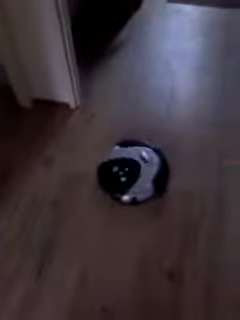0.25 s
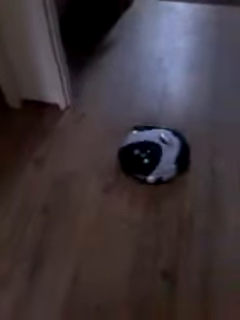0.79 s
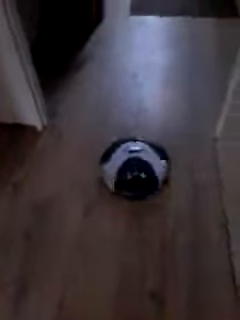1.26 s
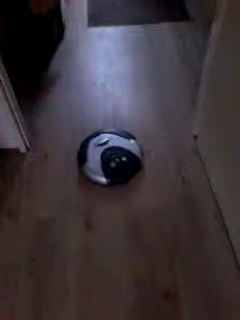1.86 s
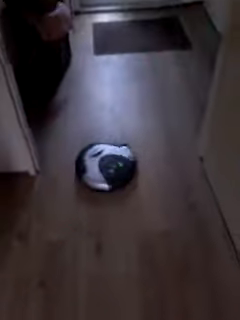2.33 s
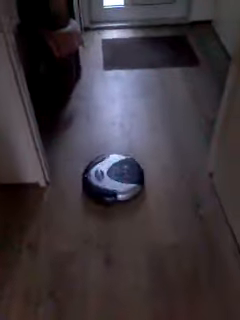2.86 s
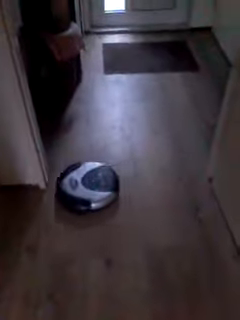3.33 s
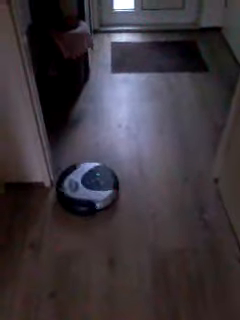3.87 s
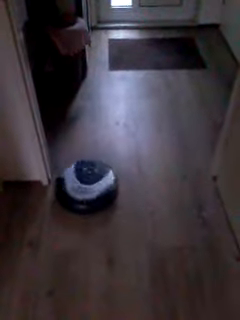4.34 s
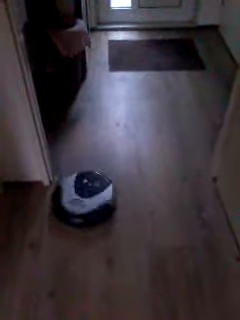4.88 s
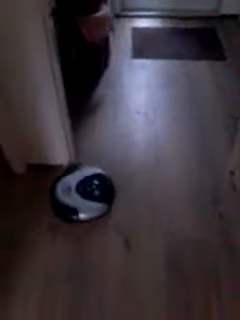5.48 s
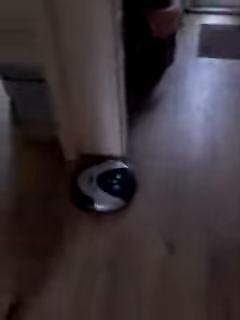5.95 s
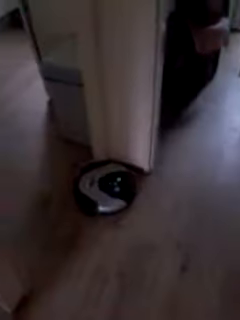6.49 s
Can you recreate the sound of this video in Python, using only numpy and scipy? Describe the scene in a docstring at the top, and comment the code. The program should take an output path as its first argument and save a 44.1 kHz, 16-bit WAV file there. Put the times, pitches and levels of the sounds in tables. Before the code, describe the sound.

Steady bright hiss and faint motor whine of a small robot cleaner indoors, with one quick rattling bump, then hissing strongest at the end.

```python
"""A robot vacuum cleaner rolls over a wooden hallway floor, heard by one microphone whose port peaks near 7 kHz.
From the start: shaped noise for rushing air, a narrow noise band drifting from 455 Hz for the humming shell,
and sine orders of a motor shaft and a fan that fade in and out. Brief swells of narrow noise join from 0.6 s.
At 3.67 s it bumps a door frame: four contacts in 0.13 s click, rattle the frame and boom in the floorboards.
The air, hum and orders run on to the end at 6.72 s, with more swells on the way and the hiss strongest at the end."""
import sys
import numpy as np
from scipy import signal
from scipy.fft import rfft, irfft, next_fast_len
from scipy.io import wavfile
from scipy.ndimage import uniform_filter1d, map_coordinates

SR = 44100
rng = np.random.default_rng(int(sys.argv[2]) if len(sys.argv) > 2 else 0)


def unload_audio(sound):
    """Save the sound as a 16-bit wav file, at the path given as the first command line argument."""
    columns = np.transpose(np.atleast_2d(sound))
    # keep every value between -1 and 1, then stretch to whole-number steps
    steps = np.round(np.clip(columns, -1, 1) * 32767)
    wavfile.write(sys.argv[1], SR, steps.astype(np.int16))


N = 296352
T = np.arange(N) / SR  # time_s

# hiss of the air before flutter: time_s, level_db
HISS_LEVEL = [(0.0, -27), (0.8, -27), (1.1, -27.5), (2.08, -27), (2.5, -28.5), (3.6, -28), (3.82, -29),
              (4.53, -28.5), (5.39, -26.5), (5.76, -27.5), (6.72, -24.5)]
# hiss colour, relative: freq_hz, density_db (per Hz)
HISS_SPECTRUM = [(2650, -25), (4500, -19), (6000, -9), (6800, 0), (7050, 1), (7910, -5), (9440, -18),
                 (12500, -25), (14300, -29), (15000, -33)]
# roar colour, relative: freq_hz, density_db (per Hz)
ROAR_SPECTRUM = [(25, -26), (60, -13.5), (110, -18), (160, -14.5), (260, -12), (350, -6), (650, -4.5),
                 (1300, -0.5), (1750, -3), (2500, 0), (3300, -4), (4600, -3.5), (6000, -4.5)]
# shell hum before waver: time_s, centre_hz, level_db
SHELL_HUM = [(0.0, 455, -47), (0.4, 460, -48.5), (0.8, 467, -44), (1.14, 465.5, -40), (1.76, 476, -45),
             (2.36, 453.8, -45), (3.0, 425.3, -49.5), (3.65, 418, -39.5), (4.1, 420, -52), (5.3, 424, -44),
             (5.65, 435.5, -51), (6.2, 450, -42), (6.45, 460, -50), (6.72, 473.4, -46)]
# narrow bands that swell and fade: peak_s, sigma_s, centre_hz, peak_level_db
SWELLS = [(0.61, 0.072, 1330, -43), (4.62, 0.37, 877, -45), (4.77, 0.23, 835, -44),
          (5.232, 0.069, 1595, -39), (5.348, .2, 1490, -43.5), (5.478, 0.06, 571, -44),
          (5.66, 0.2, 1296, -43), (6.274, 0.11, 1933, -41)]
# motor orders before fading: multiple_of_shaft, rms_db
SHAFT_ORDERS = [(3, -68.5), (4, -65), (15, -58.5), (24, -57.5), (25, -52), (33, -55.5), (36, -71),
                (42, -58)]
# fan orders before fading: multiple_of_fan, rms_db
FAN_ORDERS = [(3, -59.5), (5, -56.5), (7, -52.5), (8, -54), (10, -54.5), (11, -59.5)]
# contacts with the door frame, drive levels: start_s, click_db, knock_db
CONTACTS = [(3.669, -20, -30.5), (3.692, -29, -30.5), (3.745, -28, -32), (3.799, -36, -35)]
# click colour, relative: freq_hz, density_db (per Hz)
CLICK_SPECTRUM = [(1000, -27), (2500, -10), (5000, -4.5), (7200, 3), (9500, -8), (12000, -19.5),
                  (15000, -30)]
# door frame modes, relative: centre_hz, width_hz, gain_db
FRAME_MODES = [(130, 40, 1.5), (226, 71, 0.5), (412, 130, 0.5), (700, 290, -6.5), (1320, 190, -4),
               (2610, 490, -7.5)]
# floorboard modes: centre_hz, width_hz, gain_db
BOARD_MODES = [(125, 40, 3), (170, 40, 0), (228, 35, -3)]

SHAFT_HZ, FAN_HZ = 59.2, 165.8  # mean rotation rates
ROAR_MEAN_DB, ROAR_FOLLOWS = -32.5, 0.46  # second: share of the hiss level swings, in dB
HUM_WAVER_DB = 1.5
SWELL_WIDTH = 0.028  # share of centre_hz
RATTLE_T60_S = 0.2
BOOM_OVER_KNOCK_DB, FRAME_GAIN_DB = 29.5, 19
TOP_HZ = 15050


def amp(db):
    """Amplitude gain of a level in dB."""
    return 10 ** (np.asarray(db) / 20)


def unit(x):
    """x scaled to rms 1."""
    return x / np.sqrt(np.mean(np.abs(x) ** 2) + 1e-20)


def curves(rows):
    """Each column after time_s, interpolated to one value per sample."""
    time_s, *columns = np.transpose(rows)
    return [np.interp(T, time_s, column) for column in columns]


def wobble(knots_per_s):
    """Smooth random curve through Gaussian knots."""
    knots = rng.standard_normal(int(N * knots_per_s / SR) + 4)
    return map_coordinates(knots, [T * knots_per_s])


def filtered(x, response):
    """x through a frequency response, by zero-padded FFT."""
    size = next_fast_len(N + 8192)
    freq_hz = np.fft.rfftfreq(size, 1 / SR)
    return irfft(rfft(x, size) * response(freq_hz), size)[..., :N]


def patches(shape, bins, frames):
    """Random field of rms 1, smoothed over bins and frames."""
    field = uniform_filter1d(rng.standard_normal(shape), size=bins, axis=0)
    return unit(uniform_filter1d(field, size=frames, axis=1))


def rush(spectrum, broad_db, fine_db):
    """Coloured noise of rms 1; broad and fine random patches stand for wall reflections adding or cancelling."""
    stft = signal.stft(rng.standard_normal(N), nperseg=2048, noverlap=1536)[2]
    broad = broad_db * patches(stft.shape, 16, 16)
    fine = fine_db * patches(stft.shape, 3, 24)
    noise = signal.istft(stft * amp(broad + fine), nperseg=2048, noverlap=1536)[1][:N]
    freq_hz, density_db = np.transpose(spectrum)

    def colour(hz):
        gain_db = np.interp(np.log(hz + 1), np.log(freq_hz), density_db, right=-120)
        return (hz > freq_hz[0] / 2) * amp(gain_db)

    return unit(filtered(noise, colour))


def band(centre_hz, width_hz):
    """Narrow noise of rms 1: two slow noises modulate carriers in quadrature at a fixed or moving centre."""
    slow = filtered(rng.standard_normal((2, N)), lambda f: 1 / (1 + (2 * f / width_hz) ** 2))
    phase = 2 * np.pi * np.cumsum(centre_hz + 0 * T) / SR
    return unit(slow[0] * np.cos(phase) + slow[1] * np.sin(phase))


def resonances(modes):
    """Causal response of parallel second-order modes with alternating signs."""
    def response(f):
        total = 0
        for k, (centre_hz, width_hz, gain_db) in enumerate(modes):
            damping = 1j * f * width_hz
            total = total + (-1) ** k * amp(gain_db) * damping / (centre_hz**2 - f * f + damping)
        return total

    return response


def air():
    """Turbulent hiss and broad roar share a flutter; the hiss throbs faintly at the fan rate."""
    hiss_db, = curves(HISS_LEVEL)
    roar_db = ROAR_MEAN_DB + ROAR_FOLLOWS * (hiss_db - hiss_db.mean())
    flutter = wobble(12)
    throb = 1 + 0.039 * np.sin(2 * np.pi * FAN_HZ * T + 2 * wobble(2.4))
    hiss_gain = amp(hiss_db + 0.3 * flutter + 0.45 * wobble(40)) * throb
    hiss = hiss_gain * rush(HISS_SPECTRUM, broad_db=1.04, fine_db=1.5)
    roar = amp(roar_db + 0.27 * flutter) * rush(ROAR_SPECTRUM, broad_db=0.82, fine_db=2.1)
    return hiss + roar


def shell():
    """The hollow shell hums in a wavering band that drifts as the machine turns; other bands swell briefly."""
    centre_hz, level_db = curves(SHELL_HUM)
    out = amp(level_db + HUM_WAVER_DB * wobble(6)) * band(centre_hz, width_hz=52)
    for peak_s, sigma_s, swell_hz, peak_db in SWELLS:
        envelope = np.exp(-0.5 * ((T - peak_s) / sigma_s) ** 2)
        out += amp(peak_db) * envelope * band(swell_hz, SWELL_WIDTH * swell_hz)
    return out


def motor(rate_hz, orders, drift, fade_db):
    """Multiples of an unsteady rotation; each fades and slips in phase as the machine moves between the walls."""
    turn = 2 * np.pi * np.cumsum(rate_hz * (1 + drift * wobble(4))) / SR
    out = np.zeros(N)
    for multiple, rms_db in orders:
        gain = np.sqrt(2) * amp(rms_db + fade_db * wobble(5))
        out += gain * np.sin(round(multiple) * turn + 2 * wobble(8))
    return out


def bump():
    """Bumper meets door frame and rebounds: contacts click, shake the frame modes and strike the board modes."""
    shake, click, blows = np.zeros((3, N))
    for start_s, click_db, knock_db in CONTACTS:
        t = np.maximum(T - start_s, 0)
        shake += amp(knock_db - 60 * t / RATTLE_T60_S) * (1 - np.exp(-t / 0.0038))
        tick = amp(-60 * t / 0.014)
        hallway_tail = 0.71 * amp(-60 * t / 0.21)
        click += amp(click_db) * (1 - np.exp(-t / 0.00033)) * (tick + hallway_tail)
        blows[round(start_s * SR)] = amp(knock_db + BOOM_OVER_KNOCK_DB)

    def low_cut(f):
        return (1j * f / (90 + 1j * f)) ** 4

    frame, boards = resonances(FRAME_MODES), resonances(BOARD_MODES)
    rattle = filtered(shake * rng.standard_normal(N), lambda f: amp(FRAME_GAIN_DB) * frame(f) * low_cut(f))
    boom = filtered(blows, lambda f: boards(f) * low_cut(f))
    return rattle + boom + click * rush(CLICK_SPECTRUM, broad_db=1.0, fine_db=-3.0)


def scene():
    """Sum of the sources, the same in both channels."""
    shaft = motor(SHAFT_HZ, SHAFT_ORDERS, drift=0.00193, fade_db=4.5)
    fan = motor(FAN_HZ, FAN_ORDERS, drift=0.00795, fade_db=3.5)
    mono = air() + shell() + shaft + fan + bump()
    return np.array([mono, mono])


def record(dry):
    """Band limit: nothing passes from TOP_HZ up."""
    return filtered(dry, lambda hz: hz < TOP_HZ)


dry = scene()
out = record(dry)
unload_audio(out)
```